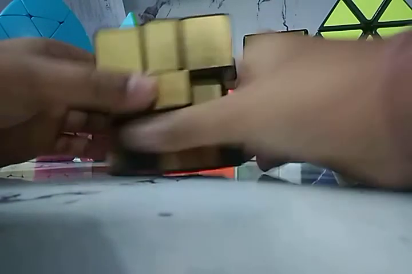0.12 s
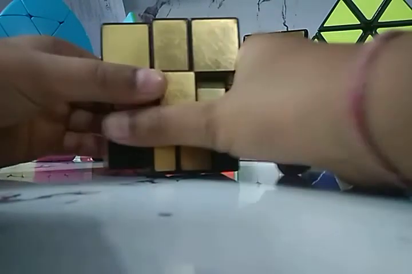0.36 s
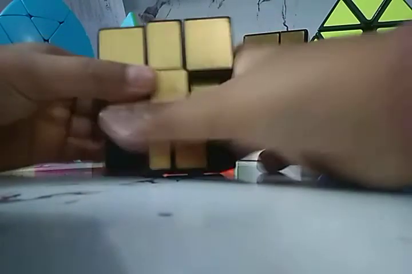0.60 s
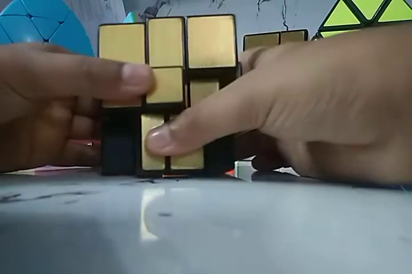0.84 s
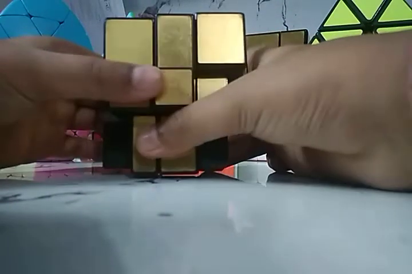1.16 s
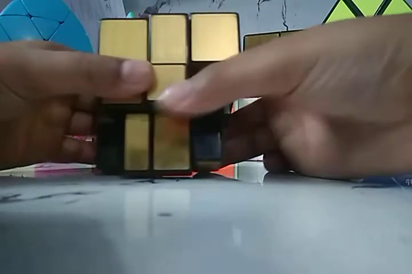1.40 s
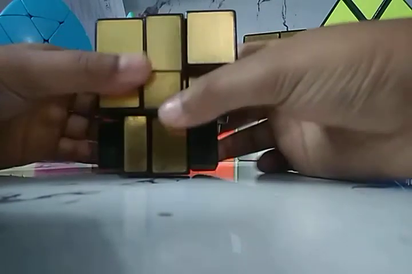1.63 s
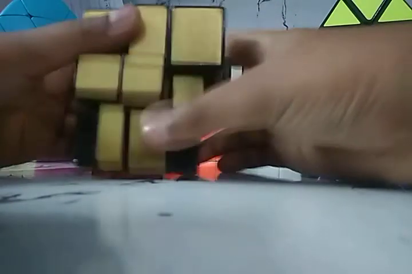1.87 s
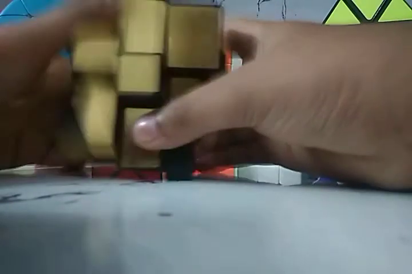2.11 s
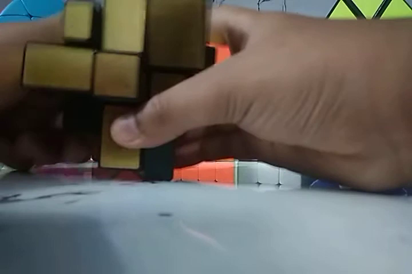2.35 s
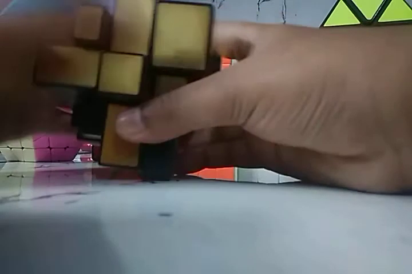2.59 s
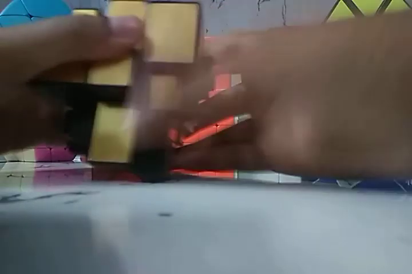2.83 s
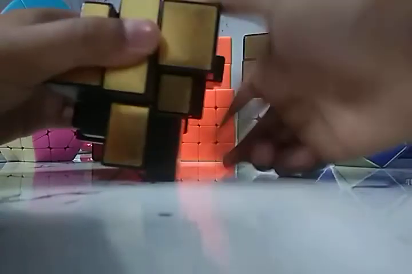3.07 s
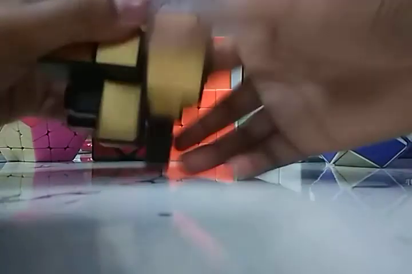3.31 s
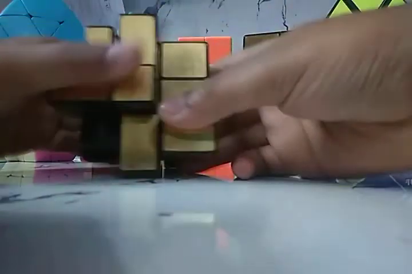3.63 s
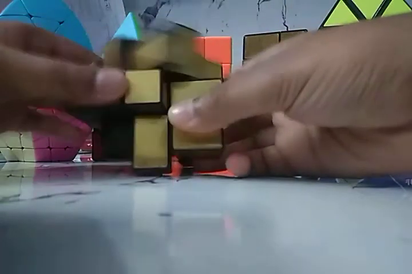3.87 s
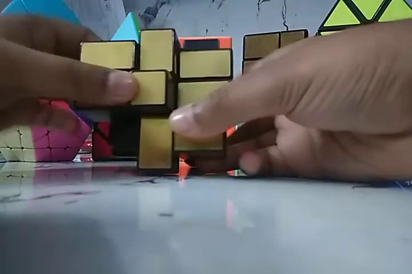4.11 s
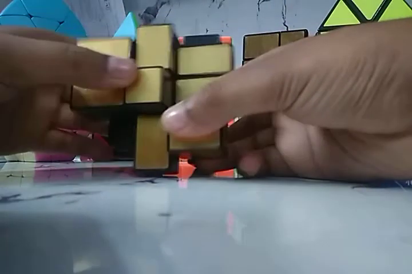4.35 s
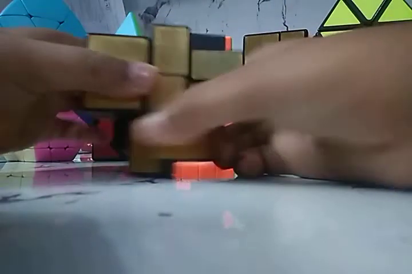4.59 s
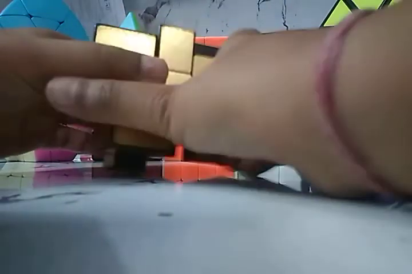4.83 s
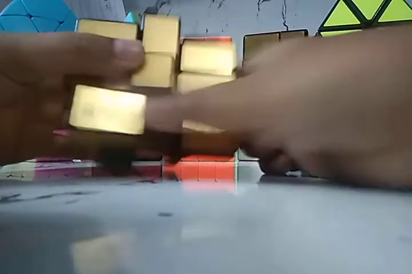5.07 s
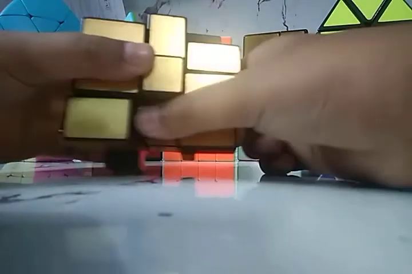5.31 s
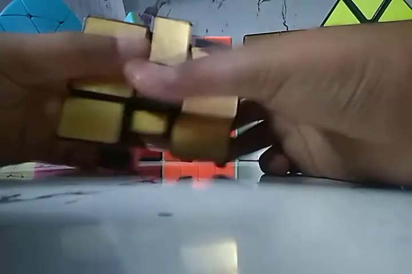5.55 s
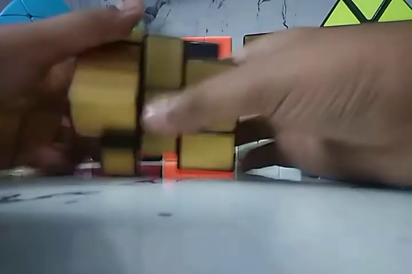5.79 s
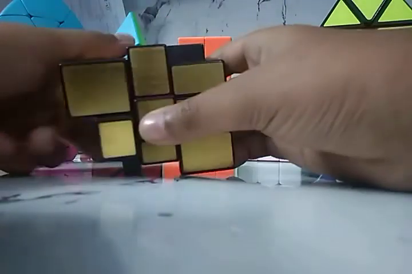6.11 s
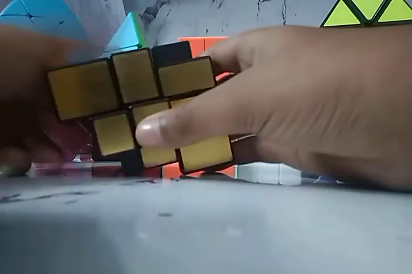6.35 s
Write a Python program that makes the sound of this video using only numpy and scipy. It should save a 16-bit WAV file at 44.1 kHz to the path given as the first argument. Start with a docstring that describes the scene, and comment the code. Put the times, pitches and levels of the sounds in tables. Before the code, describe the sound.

Quick irregular plastic clicking, dry and hollow, as a puzzle cube is turned in the hands. The clicks begin lightly, thicken before two seconds into the loudest clacks with a table knock, then continue scattered, with a firm snap after three and a half seconds and softer clicks to the end. Patchy face-on-face hiss, small scuffs and low wrist bumps accompany them, very close, leaning left, with a short room echo and faint hush.

```python
"""Puzzle cube over a table

A hollow plastic puzzle cube is twisted by hand just above a hard table in a small room.
Snapping pieces make short gritty clicks: bursts of noise that also ring the hollow shell.
Sliding faces hiss as uneven noise; knocks and dragged corners set the table's modes ringing.
Wrists rumble on the table, a fingertip squeaks once, and a soft hush lies beneath.
Two microphone ports lie on the table, the left one louder and a little later."""
import sys
import numpy as np
from scipy import signal
from scipy.io import wavfile

SR = 44100
rng = np.random.default_rng(int(sys.argv[2]) if len(sys.argv) > 2 else 0)


def log_audio(samples):
    """Write samples as a 16-bit WAV file to the path given in sys.argv[1]."""
    # one column per channel
    frames = np.atleast_2d(samples).T
    # limit to full scale, then quantise
    limited = np.clip(frames, -1, 1)
    pcm = np.round(limited * 32767).astype(np.int16)
    wavfile.write(sys.argv[1], SR, pcm)


def makeup_ratio(level_db):
    """Linear amplitude ratio for a level in decibels (20 dB per factor of ten)."""
    decades = np.asarray(level_db, float) / 20
    return 10 ** decades


N = 284445  # length in samples


def rms_one(x):
    """Scale to rms 1."""
    return x / np.sqrt(np.mean(x ** 2) + 1e-20)


def band(x, low_hz, high_hz):
    """Keep the sound between two frequencies (Butterworth band-pass)."""
    edges_hz = [low_hz, min(high_hz, .45 * SR)]
    return signal.sosfilt(signal.butter(2, edges_hz, "band", fs=SR, output="sos"), x)


def ring(x, hz, t60):
    """A resonator: a unit click sets off a sine that starts near height 1 and falls 60 dB in t60 seconds."""
    r, w = makeup_ratio(-60 / (t60 * SR)), 2 * np.pi * hz / SR
    return signal.lfilter([0, np.sin(w)], [1, -2 * r * np.cos(w), r * r], x + 1e-18)


def mode(x, hz, ring_s):
    """A resonator whose t60 is ring_s at 1 kHz; lower modes ring longer."""
    return ring(x, hz, ring_s * np.sqrt(1000 / hz))


def fade(x, t60):
    """Every impulse becomes an exponential decay that starts at the impulse's height."""
    return signal.lfilter([1], [1, -makeup_ratio(-60 / (t60 * SR))], x + 1e-18)


def drift(rate_hz):
    """Slow random wander of rms 1, made by smoothing noise."""
    r = np.exp(-2 * np.pi * rate_hz / SR)
    wander = signal.lfilter([1], [1, -2 * r, r * r], rng.standard_normal(N + SR))
    return rms_one(wander[SR:])  # the first second lets the filter settle


def grit(spread_db, channels=1):
    """Noise of rms 1 from tiny contacts of uneven size."""
    sizes = makeup_ratio(spread_db * np.minimum(rng.exponential(1, (channels, N)), 5))
    return rms_one(sizes * rng.standard_normal((channels, N)))


def two_ports(spread_db, apart):
    """Gritty contacts as the two ports hear them: partly shared, partly opposite in sign."""
    both, own = grit(spread_db, channels=2)
    return both + apart * own * [[1], [-1]]


def coloured(x, spectrum, patchy_db=0):
    """Half-octave filters give noise a spectrum, each band wandering on its own; rms 1."""
    hz, db = np.transpose(spectrum)
    edges = 25 * 2 ** np.arange(0, 9.6, .5)
    gains = makeup_ratio(np.interp(np.log(edges * 2 ** .25), np.log(hz), db))
    out, sign = 0, 1
    for gain, low_hz, high_hz in zip(gains, edges, edges[1:]):
        if gain > 1e-2:
            out = out + sign * gain * makeup_ratio(patchy_db * drift(12)) * band(x, low_hz, high_hz)
        sign = -sign  # neighbouring bands take opposite signs
    return rms_one(out)


def blows(s, level_db):
    """Single-sample impulses at the given times and levels."""
    out = np.zeros(N)
    np.add.at(out, (s * SR).astype(int), makeup_ratio(level_db))
    return out


def struck(modes, s, level_db, soft_db=0):
    """A blow is one hard contact and a short rattle, striking every mode with a strength of its own."""
    rattle_share, rattle_s = .24, .017  # share of the hard contact; t60
    soft_from_hz, soft_full_hz = 900, 330  # softness lifts modes below the first, fully below the second
    contacts = rattle_share * grit(1.5, channels=2)
    scatter_db = 2.6 * rng.standard_normal((len(s), len(modes)))
    out = 0
    for k, ((hz, mode_db, t60), own_db) in enumerate(zip(modes, scatter_db.T)):
        lift = np.clip(np.log(soft_from_hz / hz) / np.log(soft_from_hz / soft_full_hz), 0, 1)
        hit = blows(s, level_db + lift * soft_db + mode_db + own_db)
        rattle = fade(hit, rattle_s) * contacts[k // 2 % 2]  # pairs of modes take turns at two noises
        out = out + ring(hit + rattle, hz, t60)
    return band(out, .75 * modes[0][0], 1.4 * modes[-1][0])


def strokes(rows, rise, fall):
    """Each stroke swells, holds and dies away at steady rates in dB per second."""
    t = np.arange(N) / SR
    out = 0
    for s, held, db in rows:
        before, after = np.maximum(s - t, 0), np.maximum(t - s - held, 0)
        out = out + makeup_ratio(db - rise * before - fall * after)
    return out


# Pieces snapping; levels are relative, before each layer's own trim:
# (time [s], bright tick level [dB], shell level added to the tick level [dB])
SNAP_EVENTS = [(.005, -50.5, 8), (0.109, -43, 1), (0.1263, -48, 8.5), (0.1469, -42.5, -4),
               (0.223, -32.5, 0.5), (0.3339, -53, -33), (.405, -38.5, -19), (0.549, -36.5, -18),
               (0.61, -30.5, -14), (0.6406, -41, 11), (0.6654, -29, -10), (0.694, -43, -18),
               (0.849, -35.5, 0.5), (0.8947, -43.5, -6), (0.937, -37.5, -9.5), (0.964, -35, -30),
               (1.0315, -34.5, -43), (1.1051, -39.5, -17), (1.2837, -39.5, -11.5), (1.406, -79.5, 20),
               (1.452, -54.5, -16), (1.4762, -42.5, -3), (1.508, -63, 3), (1.543, -37.5, -38),
               (1.5773, -34.5, -17), (1.6117, -34, -8.5), (1.621, -48, -7), (1.6403, -33.5, -16),
               (1.676, -36, -11), (1.682, -27.5, -23), (1.6878, -43, -7.5), (1.7215, -40.5, -8.5),
               (1.7297, -33, -10), (1.74, -39, -9.5), (1.747, -36.5, -10), (1.8, -27.5, -18.5),
               (1.8473, -13, -13), (1.8556, -21.5, -13), (1.9131, -25.5, 12), (1.916, -10.5, -24),
               (1.9226, -24.5, 2), (2.046, -44, 0), (2.0737, -29, -18), (2.1124, -27.5, -16),
               (2.1726, -30.5, -12), (2.206, -41, -14), (2.241, -40, -31), (2.258, -57, 0),
               (2.323, -34.5, -8), (2.336, -38, -10), (2.393, -37, -27), (2.4193, -32, -20),
               (2.4616, -45, 5), (2.515, -42, -22.5), (2.6516, -36.5, -16.5), (2.708, -44.5, -31),
               (2.724, -43, -39.5), (2.7566, -43, -7), (2.789, -33, -16), (2.816, -27.5, -9.5),
               (2.823, -44, 6), (2.865, -36.5, -16), (2.9132, -39, -17), (2.9222, -21.5, -39),
               (2.996, -30, -27), (3.069, -28, -19.5), (3.1019, -36.5, -19.5), (3.1811, -39, -54),
               (3.206, -44, -11.5), (3.2432, -35.5, -16), (3.295, -45, -4), (3.327, -26, -17),
               (3.401, -54.5, 5), (3.5708, -40.5, -8.5), (3.5897, -26.5, -5.5), (3.622, -42, 4),
               (3.6316, -18.5, -9), (3.636, -24.5, 8), (3.729, -36.5, -7), (3.7786, -39, -9),
               (3.915, -39, 3), (3.975, -44, 0), (4.062, -28, -4.5), (4.1748, -45.5, -19.5),
               (4.21, -45.5, -13.5), (4.294, -60, -3), (4.3263, -35.5, -21.5), (4.3803, -43, -13),
               (4.413, -33.5, -30), (4.429, -38.5, -11), (4.497, -43, -5), (4.5056, -39, -8),
               (4.56, -40, -29), (4.6004, -38.5, -16), (4.622, -38, -7.5), (4.704, -42, -10),
               (4.782, -56, 4.5), (4.864, -45, -11), (4.872, -46.5, -4), (4.9575, -33, -14.5),
               (4.994, -43.5, -11.5), (5.1803, -37.5, -13.5), (5.214, -41.5, -16), (5.222, -38.5, -16),
               (5.256, -46.5, -5.5), (5.31, -48, -4), (5.3435, -56, 2.5), (5.4, -55.5, -13.5),
               (5.4178, -41.5, -15), (5.433, -50, -31), (5.4398, -40.5, -7.5), (5.612, -48, -11.5),
               (5.635, -41.5, -15.5), (5.668, -39, 3), (5.717, -37.5, 3), (5.821, -32.5, -1),
               (5.836, -24, 0), (5.987, -45, -15), (6.0426, -35, -13.5), (6.117, -35, -0.5),
               (6.2147, -40, -28), (6.3836, -33.5, -36.5), (6.396, -38.5, -10)]
# Borders of the bands that colour each tick: (frequency [Hz])
TICK_BANDS = [1700, 2800, 4500, 7000, 11000, 19000]


def ticks():
    """Hard edges crack: noise with a very short rise and a quick decay, each crack coloured by chance."""
    s, tick_db, _ = np.transpose(SNAP_EVENTS)
    colour_db = 2.5 * rng.standard_normal((len(s), len(TICK_BANDS) - 1))
    noise, out = two_ports(4.7, apart=0.85), 0
    for low_hz, high_hz, own_db in zip(TICK_BANDS, TICK_BANDS[1:], colour_db.T):
        hit = blows(s, tick_db + own_db - 35.0)
        decay = fade(hit, 0.014) + makeup_ratio(-15) * fade(hit, .035)
        shape = fade(decay, .0025)  # smoothing by a second short decay makes the rise
        out = band(shape * noise, low_hz, high_hz) - out  # neighbouring bands take opposite signs
    return band(out, 1400, SR)


# Ways the hollow shell rings, before the grip shifts them: (frequency [Hz], level [dB])
SHELL_MODES = [(1410, -15.5), (1600, -17), (1810, 14), (1970, 18.5), (2260, -3), (2560, 11), (2950, 3.5),
               (3500, -13.5), (4300, -18), (5400, -26)]
# How the hands' hold shifts the shell's pitch: (frequency factor [ratio])
GRIP_PITCHES = [.95, 1.0, 1.06]


def shell_ring():
    """Each snap rings the hollow shell, its pitch picked at random from a few grips."""
    ring_s = .010  # t60 at 1 kHz, longer for lower modes
    s, tick_db, shell_db = np.transpose(SNAP_EVENTS)
    level_db = tick_db + shell_db - 21.0
    held = rng.integers(0, len(GRIP_PITCHES), len(s))
    shell = 0
    for k, grip in enumerate(GRIP_PITCHES):
        modes = [(hz * grip, db, ring_s * np.sqrt(1000 / hz)) for hz, db in SHELL_MODES]
        shell = shell + struck(modes, s[held == k], level_db[held == k])
    return shell


# Ways the table top rings, before the spot shifts them: (frequency [Hz], level [dB], t60 [s])
TABLE_MODES = [(115, -26.5, 0.087), (165, -9.5, 0.077), (280, -3, 0.13), (325.4, -1.5, 0.16),
               (363, -3, 0.11), (468, 2, 0.074), (580, 5.5, 0.06), (642.7, 5, 0.045), (760, 3.5, 0.063),
               (828, 1, 0.026), (977, 1, 0.04), (1119, -1, 0.014), (1328, -1.5, 0.02), (1580, -1.5, 0.024)]
# How the touched place shifts the table's pitch: (frequency factor [ratio])
SPOT_PITCHES = [.95, 1.0, 1.06]
# The cube touches the table; levels are relative, before the trim:
# (time [s], level [dB], softness: lift of low modes over high ones [dB])
KNOCK_EVENTS = [(.005, -40, -12), (.071, -51.5, 4), (0.2219, -32, -7.5), (0.55, -51.5, 10.5),
                (0.608, -47, 0), (0.6417, -41, -17), (0.6626, -31.5, -7), (0.6949, -38, -30),
                (0.851, -36, 5.5), (.936, -58, 10), (1.022, -60, 9), (1.05, -58.5, 9.5), (1.5768, -45, -4),
                (1.6147, -43, -23), (1.6372, -53, 9), (1.684, -48, -17), (1.7333, -47, -5),
                (1.8006, -38.5, -29), (1.915, -12, -38), (1.924, -54, 17.5), (2.0494, -69, 17),
                (2.0747, -46.5, -32), (2.1705, -44.5, -3), (2.4218, -48, -15), (2.816, -39.5, -8),
                (2.926, -58.5, 22.5), (3.0697, -50.5, 5), (3.5872, -35, -46), (3.638, -21.5, -28),
                (3.7307, -43, -29), (3.9187, -36.5, -16), (4.062, -46, 5.5), (4.123, -55, -2),
                (4.2092, -67, 14), (4.246, -73.5, 22), (4.431, -53, -4), (4.5067, -50.5, 7),
                (4.703, -42.5, -43), (4.9565, -60, -25), (5.056, -46.5, 8), (5.063, -45.5, 10.5),
                (5.43, -58, -5), (5.6664, -38, -14), (5.716, -46.5, 8), (5.822, -52, -10), (5.836, -45, 6),
                (6.118, -34.5, -1), (6.123, -45, 7), (6.3811, -55, 10.5)]


def table_knocks():
    """Knocks, and faintly the snaps through the hands, ring the table; knocks add a broad noisy slap."""
    snap_to_table_db, snap_soft_db = -26, 5.5  # what a snap passes on, and how softly
    slap_db, slap_s, slap_dulls = -0.5, 0.019, 0.48  # added to knock level; t60; dB lost per dB of softness
    snap_s, tick_db, _ = np.transpose(SNAP_EVENTS)
    knock_s, knock_db, soft_db = np.transpose(KNOCK_EVENTS)
    s = np.r_[snap_s, knock_s]
    level_db = np.r_[tick_db + snap_to_table_db, knock_db] - 18.0
    soft = np.r_[0 * snap_s + snap_soft_db, soft_db]
    spot = rng.integers(0, len(SPOT_PITCHES), len(s))
    knock = 0
    for k, pitch in enumerate(SPOT_PITCHES):
        modes = [(hz * pitch, db, t60) for hz, db, t60 in TABLE_MODES]
        knock = knock + struck(modes, s[spot == k], level_db[spot == k], soft[spot == k])
    touch = blows(knock_s, knock_db + slap_db - slap_dulls * np.maximum(soft_db, 0))
    slap = band(fade(touch, slap_s) * two_ports(1.5, apart=.6), 500, 2400)
    return knock + slap


def stick_slip():
    """Rubbing is uneven: its strength wanders, and ridges catch at random moments."""
    snag_s = .012  # t60 of a ridge catching
    snags = (rng.random(N) < 110 / SR) * makeup_ratio(3 * rng.standard_normal(N))  # about 110 per second
    catches = fade(snags, snag_s)
    return catches, makeup_ratio(3.5 * drift(45)) + 3 * catches


# A layer turns, face on face: (time of reaching full level [s], held [s], level [dB])
TURN_STROKES = [(0.0, 0.33, -58), (.6, 0.15, -66.5), (.92, 0.14, -67), (1.08, 0.051, -63), (1.57, .24, -71),
                (1.93, 0.077, -48.5), (2.0, 0.091, -58.5), (2.15, 0.18, -51.5), (2.42, 0.057, -61.5),
                (3.09, 0.12, -67.5), (3.29, 0.13, -50.5), (3.65, 0.27, -64.5), (3.89, 0.23, -51),
                (4.36, 0.25, -67), (4.6, 0.11, -58), (4.72, 0.096, -59.5), (4.88, 0.04, -75),
                (4.98, 0.093, -65.5), (5.22, 0.11, -66), (5.66, 0.29, -59.5), (5.8, 0.072, -55.5),
                (6.08, 0.051, -61), (6.24, 0.024, -61.5)]
# Colour of the sliding hiss: (frequency [Hz], relative density [dB per Hz])
RUB_SPECTRUM = [(590, -41), (1000, -22.5), (1240, -23), (2000, -6.5), (4830, -15), (9430, -13.5),
                (15000, -11)]


def turning_faces(catches, contact):
    """Faces slide with a patchy hiss, while friction and catching ridges keep the shell ringing."""
    hum, ring_s, ring_db = 0.13, 0.017, -6  # steady friction; t60 at 1 kHz; shell ring against hiss
    hiss = coloured(contact * two_ports(3.0, apart=1.0), RUB_SPECTRUM, patchy_db=4.5)
    push = (hum * makeup_ratio(2.4 * drift(9.2)) + catches) * grit(0.87)[0]
    rubbed_shell = rms_one(sum(makeup_ratio(db) * mode(push, hz, ring_s) for hz, db in SHELL_MODES))
    stroke = strokes(TURN_STROKES, rise=230, fall=890)
    return (hiss + makeup_ratio(ring_db) * rubbed_shell) * stroke


# A corner drags on the table: (time of reaching full level [s], held [s], level [dB])
SCUFF_STROKES = [(0.0, 0.023, -58.5), (.24, 0.0045, -62.5), (.67, 0.012, -61), (1.57, 0.47, -62),
                 (1.93, 0.05, -48.5), (2.06, 0.3, -68), (2.84, 0.0034, -62), (3.3, 0.0097, -56),
                 (3.65, 0.057, -57.5), (3.89, 0.0053, -43.5), (4.0, 0.05, -51.5), (4.6, 0.06, -58),
                 (5.66, 0.13, -61.5), (5.83, 0.06, -52), (6.14, .01, -61), (6.24, 0.0096, -63.5),
                 (6.4, 0.01, -71.5)]


def dragged_corners(contact):
    """Uneven gritty pushes from a dragging corner keep the table's modes ringing."""
    push = grit(4.03)[0] * contact
    ringing = sum(makeup_ratio(db) * ring(push, hz, t60) for hz, db, t60 in TABLE_MODES)
    return rms_one(band(ringing, 250, 2200)) * strokes(SCUFF_STROKES, rise=270, fall=220)


# A wrist shifts on the table: (time of reaching full level [s], held [s], level [dB])
WRIST_STROKES = [(.24, 0.018, -59), (.67, 0.019, -50), (1.852, 0.023, -44.5), (1.92, 0.0069, -32),
                 (2.84, 0.017, -53.5), (3.08, 0.012, -51.5), (3.32, 0.0097, -58.5), (3.65, 0.036, -49.5),
                 (3.87, 0.12, -45), (4.07, 0.011, -47.5), (4.36, 0.0075, -66.5), (5.843, 0.0095, -49.5)]


def shifting_wrists():
    """Wrists make a low uneven rumble that swells as they shift and never quite stops."""
    rest_db = -81
    rumble = rms_one(band(two_ports(1.3, apart=0.72) * makeup_ratio(1.5 * drift(15)), 45, 170))
    return rumble * (strokes(WRIST_STROKES, rise=890, fall=900) + makeup_ratio(rest_db))


def squeak():
    """A fingertip slips on a face: a short wavering tone that rises as the slip speeds up."""
    start_s, length_s, level_db = 1.418, .034, -72
    from_hz, to_hz = 1120, 1290
    part = np.clip((np.arange(N) / SR - start_s) / length_s, 0, 1)
    hz = from_hz + (to_hz - from_hz) * part ** 2 + 16.0 * drift(150)
    swell = np.sin(np.pi * part) ** .5
    return makeup_ratio(level_db + 1.0 * drift(80)) * swell * np.sin(2 * np.pi * np.cumsum(hz) / SR)


# Echoes of the small room; band() limits the top edge:
# (from [Hz], to [Hz], t60 [s], relative level [dB])
ROOM_BANDS = [(61.5, 1120, 0.39, -6.5), (550, 1650, 0.18, -4), (1700, 2980, 0.15, -4),
              (3200, 50000, 0.3, -13)]


def room(x):
    """Dense reflections: noise that swells in almost at once and dies at its own pace in each band."""
    t = np.arange(SR // 2) / SR
    both, own = rng.standard_normal((2, len(t)))
    tail = 0
    for low_hz, high_hz, t60, level_db in ROOM_BANDS:
        noise = rms_one(band(both + own * [[1], [-1]], low_hz, high_hz))
        # allow for how wide the band is and how long it rings
        share = np.sqrt(4 * np.log(1000) * (high_hz - low_hz) / (t60 * SR ** 2))
        tail = tail + noise * share * makeup_ratio(level_db - 60 * t / t60)
    tail = tail * (1 - np.exp(-t / 0.000087))
    return signal.fftconvolve(x[None], tail)[:, :N]


# Colour of the room hush: (frequency [Hz], relative density [dB per Hz])
HUSH_SPECTRUM = [(18, -22.5), (30, -3.5), (77, 3), (199, -30.5), (4420, -34.5), (4780, -31), (9460, -27),
                 (16000, -26.5)]


def room_hush():
    """Steady coloured noise, partly shared by the two ports, lies under everything."""
    return makeup_ratio(-82) * coloured(two_ports(0, apart=.6), HUSH_SPECTRUM)


def at_ports(x, left_db, lag):
    """The left port hears a sound louder by left_db and later by lag samples."""
    left, right = x * makeup_ratio([[.5], [-.5]] * np.atleast_1d(left_db))
    return np.array([np.pad(left, (lag, 0))[:N], right])


# Where the hands hold the cube: (time [s], left port above right [dB])
CUBE_POSITION = [(.2, 11), (0.498, 8), (1.4, 8.5), (1.8, 7.5), (2.899, 9), (3.601, 8), (4.4, 8.5), (5.1, 5),
                 (5.8, 10.5), (6.4, 3.5)]


def scene():
    """Edges, shell and table reach the ports by their own paths; the room and its hush surround them."""
    cube_lag, table_lag = 12, 8  # samples; shell and table ring share the second
    table_left_db = 2.5
    catches, contact = stick_slip()
    shell = shell_ring()
    cube = ticks() + turning_faces(catches, contact) + squeak()
    table = table_knocks() + dragged_corners(contact) + shifting_wrists()
    left_db = np.interp(np.arange(N) / SR, *np.transpose(CUBE_POSITION))
    near = at_ports(cube, left_db, cube_lag) + at_ports(shell, left_db, table_lag)
    near = near + at_ports(table, table_left_db, table_lag)
    return near + room((cube + shell + table)[0]) + room_hush()


def low_pass(x):
    """Removes everything above the highest recorded frequency."""
    return signal.sosfilt(signal.butter(12, 16640, fs=SR, output="sos"), x)


def record(dry):
    """The microphone ports resonate, lifting one treble band, and cut what lies above it."""
    centre_hz, width_hz, added_db, cut_hz = 9320, 2200, -1.5, 11520
    resonance = band(dry, centre_hz - width_hz / 2, centre_hz + width_hz / 2)
    lifted = dry + makeup_ratio(added_db) * resonance
    mix = signal.sosfilt(signal.butter(4, cut_hz, fs=SR, output="sos"), lifted)
    return low_pass(mix)


dry = scene()
out = record(dry)
log_audio(out)
```